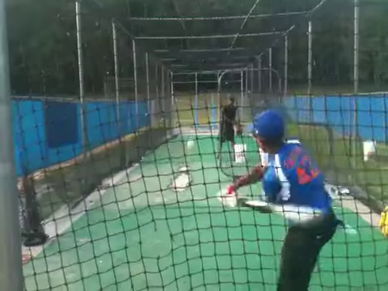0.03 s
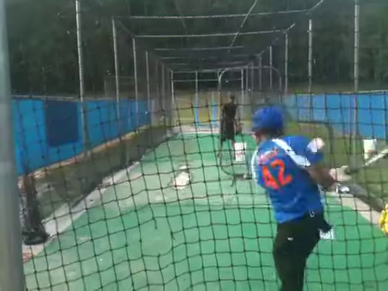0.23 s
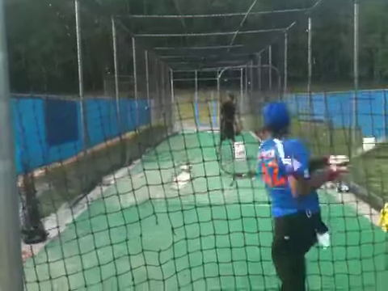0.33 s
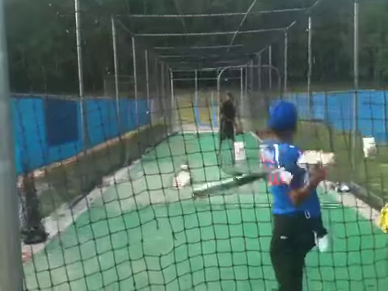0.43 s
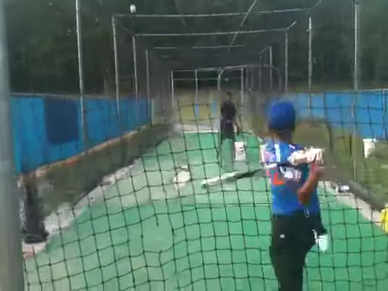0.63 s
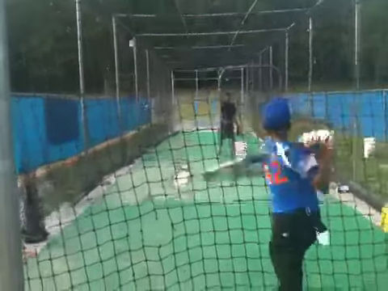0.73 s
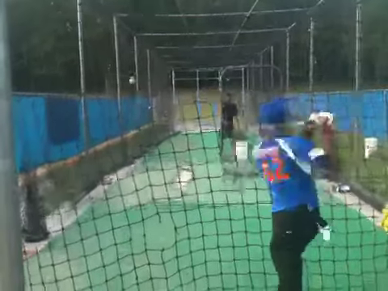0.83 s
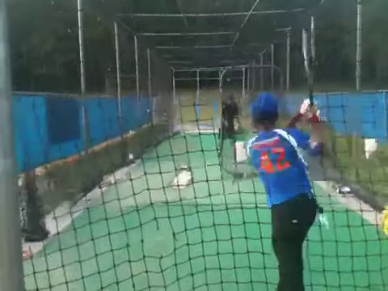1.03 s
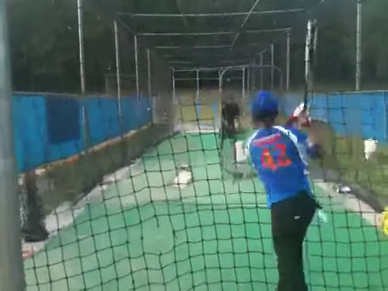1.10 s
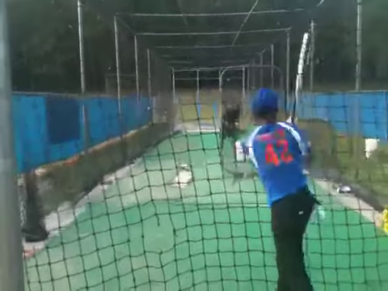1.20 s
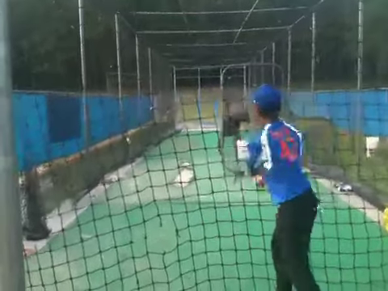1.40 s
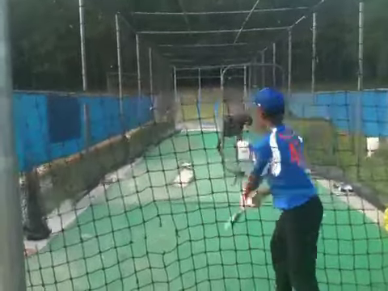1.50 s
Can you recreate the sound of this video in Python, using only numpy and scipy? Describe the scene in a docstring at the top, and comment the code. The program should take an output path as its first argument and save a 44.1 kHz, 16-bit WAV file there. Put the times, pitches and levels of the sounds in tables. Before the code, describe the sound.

Hard bat-and-ball crack close to an overloaded microphone in an outdoor batting cage, its metallic ping wavering and fading, followed by a quick net slap, quiet cloth snaps and a hollow thud.

```python
"""Metal bat striking a ball in an outdoor cage

Shaped noise makes the bat's swish, the scuffs, the cloth and the outdoor air; short tones make the steps.
A click, a knock, a noise burst and damped modes make the crack, which overloads the microphone.
The barrel's ping, a gliding sine, bends as the bat swings round and lingers in narrow noise bands.
The ball slaps the net in noise bursts; a second after the hit something lands with a dull modal thud."""
import sys
import numpy as np
from scipy import signal
from scipy.fft import rfft, irfft
from scipy.io import wavfile

SR = 44100
rng = np.random.default_rng(int(sys.argv[2]) if len(sys.argv) > 2 else 0)


def unload_wav(signal):
    """Save mono or channel-first audio to the path in sys.argv[1] as 16-bit WAV at rate SR, clipped to [-1, 1]."""
    wavfile.write(
        sys.argv[1],
        SR,
        np.round(np.clip(np.atleast_2d(signal).T, -1, 1) * 32767).astype(np.int16),
    )


N = 68355
T = np.arange(N) / SR  # s
HIT_S = 0.208  # contact of bat and ball
BAT_RISE_S = 0.0036  # onset of the bat's modes and of its ping

# spectrum of shoe scuffs, also of the thud's wash: f/Hz, relative level/dB
SCUFF_COLOUR = [(100, -31), (280, -4), (700, -0.5), (1500, 1.5), (3000, -5), (6000, -7.5), (16000, -32)]


def amp(db):
    """Level to gain: 20 dB is a factor of ten in amplitude."""
    return 10 ** (np.asarray(db) / 20)


def unit(x):
    """Normalization to unit root-mean-square amplitude."""
    return x / np.sqrt(np.mean(x ** 2) + 1e-20)


def colour_db(colour, f):
    """Spectral interpolation: level in dB between (f/Hz, level/dB) points on a logarithmic axis."""
    hz, db = np.transpose(colour)
    return np.interp(np.log(f + 1), np.log(hz + 1), db)


def noise(colour):
    """Spectral shaping: white noise filtered to a given colour, at rms 1."""
    f = np.fft.rfftfreq(N, 1 / SR)
    spectrum = rfft(rng.standard_normal(N))
    return unit(irfft(spectrum * amp(colour_db(colour, f)), N))


def narrow(hz, width):
    """Narrow-band noise: random phases under a Gaussian spectrum, at rms 1."""
    f = np.fft.rfftfreq(N, 1 / SR)
    phase = 2 * np.pi * rng.random(len(f))
    return unit(irfft(np.exp(1j * phase - ((f - hz) / width) ** 2), N))


def click(colour):
    """Minimum phase: a causal click whose phase follows from its log-magnitude by Hilbert transform."""
    f = abs(np.fft.fftfreq(2048, 1 / SR))
    log_gain = np.log(amp(colour_db(colour, f)))
    return np.fft.ifft(np.exp(np.conj(signal.hilbert(log_gain)))).real


def decay(start, t60, rise=0.000073, hold=0):
    """Exponential damping: linear rise, optional hold, then a fall of 60 dB per t60."""
    t = np.maximum(T - start, 0)
    return np.minimum(t / rise, 1) * amp(-60 * np.maximum(t - hold, 0) / t60)


def swell(peak, rise, fall):
    """Gaussian envelope with separate rise and fall times to 1/e."""
    return np.exp(-((T - peak) / np.where(T < peak, rise, fall)) ** 2)


def ring(modes, start, rise, damping=1, upper_hold=0):
    """Modal superposition: damped sines of a struck object, those above 4 kHz optionally held first."""
    total = np.zeros(N)
    for hz, db, t60 in modes:
        envelope = decay(start, t60 / damping, rise, upper_hold * (hz > 4000))
        total += amp(db) * envelope * np.sin(2 * np.pi * hz * (T - start))
    return total


def tones(rows):
    """Gaussian tone pulses: brief sines with soft edges."""
    total = np.zeros(N)
    for peak, hz, db, half in rows:
        # a sine of rms 1 has the peak value sqrt(2)
        total += np.sqrt(2) * amp(db) * swell(peak, half, half) * np.sin(2 * np.pi * hz * (T - peak))
    return total


def bursts(rows, colour):
    """Impulsive noise: one coloured noise under sharp, exponentially damped envelopes."""
    return noise(colour) * sum(amp(db) * decay(start, t60) for start, db, t60 in rows)


def rubs(rows, colour):
    """Friction noise: one coloured noise under soft swells."""
    return noise(colour) * sum(amp(db) * swell(peak, rise, fall) for peak, db, rise, fall in rows)


def air():
    """Stationary broadband noise: outdoor rumble and hiss whose level wavers slightly."""
    # outdoor air: f/Hz, relative level/dB
    air_colour = [(25, -42.5), (60, -26.5), (87, -19), (115, -7), (170, -4.5), (250, -2), (335, -6.5),
                  (450, -10), (700, -16.5), (1200, -18.5), (1900, -19.5), (2900, -23.5), (4400, -19),
                  (6300, -22), (8200, -29.5), (10500, -25.5), (13000, -31.5), (16000, -33.5)]
    level_db, waver_db, waver_hz = -60, 0.41, 9  # waver_db is rms
    return amp(level_db + waver_db * narrow(0, waver_hz)) * noise(air_colour)


def footsteps():
    """Impact and friction: low thumps of feet on the mat as tone pulses, scuffs of shoes as noise."""
    # thumps: peak t/s, f/Hz, level/dB, half length/s
    steps = [(.018, 232, -45.5, 0.004), (.08, 170, -50.5, 0.022), (.125, 161, -53.5, 0.0083),
             (.269, 172, -48, .009), (.905, 163.5, -54, 0.025)]
    # scuffs: peak t/s, level/dB, rise/s, fall/s
    scuffs = [(.019, -57, 0.01, 0.014), (.6, -62, 0.086, 0.22)]
    return tones(steps) + rubs(scuffs, SCUFF_COLOUR)


def swish():
    """Aerodynamic noise: the moving bat heard as swells of broadband noise."""
    # swells: peak t/s, level/dB, rise/s, fall/s
    swishes = [(.135, -56.5, 0.023, .02), (.166, -50.5, 0.032, 0.029)]
    # their spectrum: f/Hz, relative level/dB
    swish_colour = [(200, -11.5), (1000, -8.5), (1800, 6), (2600, -0.5), (4500, -7.5), (6500, -8.5),
                    (10000, -14), (16000, -19)]
    return rubs(swishes, swish_colour)


def crack():
    """Impact excitation: a hard click, the ball's hollow knock, a dense burst and damped bat modes."""
    # click at the first instant of contact: f/Hz, relative level/dB
    click_colour = [(200, -16), (1000, -9), (2500, -9), (4300, 1), (5800, -0.5), (8000, -11), (11000, -7),
                    (13500, -7), (16000, -9)]
    # dense burst: f/Hz, relative level/dB
    burst_colour = [(60, -36), (180, -26), (330, -14.5), (600, -11), (1020, -11.5), (1300, 4.5), (1500, -5),
                    (1780, -1.5), (2900, -13.5), (4300, -6.5), (5600, -10), (8000, -19), (10300, -11.5),
                    (13000, -18), (16000, -16)]
    # short-lived bat modes: f/Hz, level/dB, t60/s
    bat_modes = [(682, -26, 0.037), (876.5, -20.5, 0.06), (1308, -10, .042), (1646, -13.5, 0.035),
                 (2230, -25, 0.084), (2500, -25.5, 0.072), (4180, -13, .036), (5260, -22.5, 0.016),
                 (5360, -21.5, .035), (5655, -21.5, .04), (9646, -21.5, .04)]
    click_db, burst_db = 9, -10.5
    impulse = 1. * (np.arange(N) == round(HIT_S * SR))
    snap = amp(click_db) * signal.oaconvolve(impulse, click(click_colour))[:N]
    # the knock peaks 1.8 ms after contact and lasts about two cycles
    knock = tones([(HIT_S + 0.0018, 605, -12.5, 0.0014)])
    burst = amp(burst_db) * noise(burst_colour) * decay(HIT_S, 0.034, hold=0.0035)
    return snap + knock + burst + ring(bat_modes, HIT_S, BAT_RISE_S, upper_hold=0.008)


def ping():
    """Doppler effect: the barrel's main mode glides as the swing carries it away and back."""
    # heard pitch: t/s, f/Hz
    ping_pitch = [(.208, 1962), (.24, 1940), (.262, 1971), (.295, 2049), (.33, 2061.5), (.362, 2078.5),
                  (.4, 2041.5), (.46, 2009.5), (.54, 1963.5)]
    # heard level: t/s, rms level/dB
    ping_level = [(.208, -25), (.215, -16), (.224, -21), (.232, -11.5), (.247, -32.5), (.256, -21.5),
                  (.273, -46), (.298, -42.5), (.316, -38), (.335, -43.5), (.349, -32), (.381, -36),
                  (.39, -50), (.415, -40), (.46, -52.5), (.55, -71)]
    hz = np.interp(T, *np.transpose(ping_pitch))
    db = np.interp(T, *np.transpose(ping_level), right=-120)
    phase = 2 * np.pi * np.cumsum(hz * (T > HIT_S)) / SR
    onset = np.clip((T - HIT_S) / BAT_RISE_S, 0, 1)
    return np.sqrt(2) * amp(db) * onset * np.sin(phase)


def surroundings():
    """Reflection and scattering: cage and trees return the crack as noise, the ping as shifted tones."""
    # cage scatter and its reflections: f/Hz, relative level/dB
    scatter_colour = [(100, -13), (450, -0.5), (1000, 0), (2200, 0), (3000, -3), (4600, 0.5), (7500, -11),
                      (11000, -11), (16000, -22)]
    # far tail: f/Hz, relative level/dB
    far_colour = [(100, -15), (600, -9), (1400, 0.5), (3000, 1), (4800, 3.5), (8000, -8.5), (16000, -20)]
    # reflections of the crack: t/s, level/dB, t60/s
    reflections = [(.2345, -26, .03), (.2675, -45.5, .02)]
    # echoes of the ping's start, up ahead of the swing, down behind: peak t/s, f/Hz, level/dB, half length/s
    echoes = [(0.259, 2098, -33.5, .022), (0.283, 1915, -50.5, 0.025), (0.381, 1877, -58.5, 0.022),
              (.622, 1900, -57, 0.036)]
    # diffuse lingering of the ping: f/Hz, width/Hz, level/dB, t60/s
    linger_bands = [(2097, 24, -59, 3.3), (1900, 26, -63, 3.4)]
    scatter_db, scatter_t60, far_db, far_t60 = -22.5, 0.19, -50, 1.3  # dB, s, dB, s
    grain_db, grain_hz = 2.5, 220  # rms depth and bandwidth of the scatter's unevenness
    scatter = amp(scatter_db) * noise(scatter_colour) * decay(HIT_S, scatter_t60, rise=0.018)
    scatter *= amp(grain_db * narrow(0, grain_hz))
    far = amp(far_db) * noise(far_colour) * decay(HIT_S, far_t60, rise=0.03)
    linger = np.zeros(N)
    for hz, width, db, t60 in linger_bands:
        linger += amp(db) * narrow(hz, width) * decay(HIT_S, t60, rise=0.044)
    return scatter + far + bursts(reflections, scatter_colour) + tones(echoes) + linger


def net_slap():
    """Impulsive noise radiation: the ball slaps the net in a cluster of damped bursts."""
    # slaps: t/s, level/dB, t60/s
    slaps = [(.3343, -33.5, 0.018), (.338, -35, 0.027), (.345, -45.5, 0.16)]
    # their spectrum: f/Hz, relative level/dB
    slap_colour = [(100, -28), (300, -29), (560, 1), (780, -1), (1050, 8), (1500, 1.5), (2500, 1),
                   (4500, -4), (8000, -9), (13000, -12.5), (16000, -22)]
    return bursts(slaps, slap_colour)


def clothes():
    """Friction noise: cloth rustles in soft swells and snaps in sharp bursts."""
    # rustles: peak t/s, level/dB, rise/s, fall/s
    rustles = [(.99, -62.5, 0.089, 0.057), (1.056, -56.5, .014, 0.017)]
    # snaps: t/s, level/dB, t60/s
    snaps = [(1.0388, -48, 0.016), (1.0503, -46, .008), (1.064, -51, .006), (1.3025, -54, .007),
             (1.414, -56, .03)]
    # spectrum of both: f/Hz, relative level/dB
    cloth_colour = [(200, -2), (1000, 1), (1750, 9), (2800, -15.5), (4600, 0), (6500, -4), (9000, 0),
                    (12500, -7.5), (16000, -13)]
    return rubs(rustles, cloth_colour) + bursts(snaps, cloth_colour)


def thud():
    """Damped modal impact: a dull landing and a softer rebound, each with knock, deep ring and tick."""
    # landing and rebound: t/s, body level/dB, tick level/dB, damping factor of the deep ring
    landings = [(1.2289, -23.5, -35, 0.97), (1.252, -34, -56, 2.1)]
    # hollow knock: f/Hz, level relative to the body/dB, t60/s
    knock_modes = [(502, -14, 0.012), (622, 0.5, 0.014), (1227, -2, 0.01)]
    # deep ring at damping 1: f/Hz, level relative to the body/dB, t60/s
    deep_modes = [(210, -0.5, 0.044)]
    # tick: f/Hz, relative level/dB
    tick_colour = [(100, -20), (1000, -2), (2100, -20), (2650, -1), (2950, -11.5), (3400, 9.5),
                   (4100, -7.5), (5300, -12.5), (7000, -20), (16000, -27)]
    rise_s, tick_t60 = 0.00072, 0.016
    # faint wash in the cage after the landing, -48.5 dB with t60 0.09 s
    total = bursts([(landings[0][0], -48.5, 0.09)], SCUFF_COLOUR)
    tick = noise(tick_colour)
    for start, db, tick_db, damping in landings:
        # more damping makes the deep ring both shorter and weaker
        deep = ring(deep_modes, start, rise_s, damping) / damping
        body = ring(knock_modes, start, rise_s) - deep
        total = total + amp(db) * body + amp(tick_db) * tick * decay(start, tick_t60)
    return total


def scene():
    """Linear superposition: sources high-passed for the microphone's bass loss, over the outdoor air."""
    background = air()
    sources = footsteps() + swish() + crack() + ping() + surroundings()
    sources = sources + net_slap() + clothes() + thud()
    bass_cut = signal.butter(3, 180, "high", fs=SR, output="sos")  # Hz
    return (signal.sosfilt(bass_cut, sources) + background)[None]


def record(dry):
    """Saturation: the crack overloads the microphone; a linear-phase low-pass then limits the band."""
    clip_level, edge_hz = 0.68, 16000  # clip_level is the amplitude the curve tends to
    clipped = dry / (1 + (dry / clip_level) ** 6) ** (1 / 6)
    low_pass = signal.firwin(255, edge_hz, window=("kaiser", 9), fs=SR)
    return signal.oaconvolve(clipped, low_pass[None], "same")


dry = scene()
out = record(dry)
unload_wav(out)
```